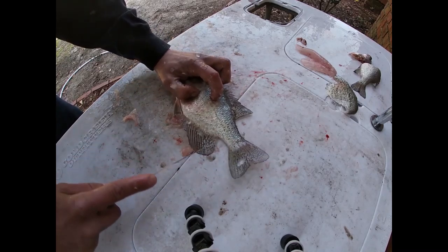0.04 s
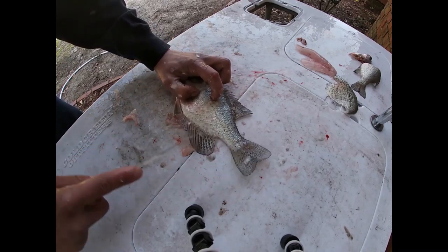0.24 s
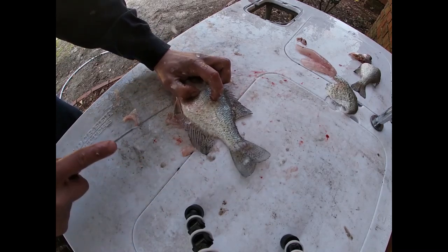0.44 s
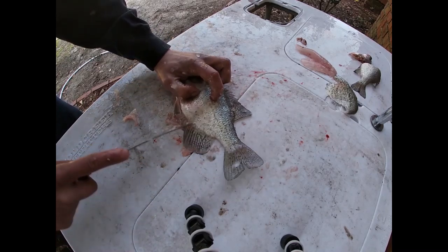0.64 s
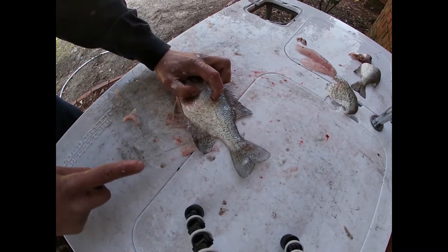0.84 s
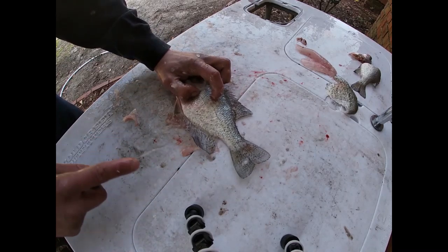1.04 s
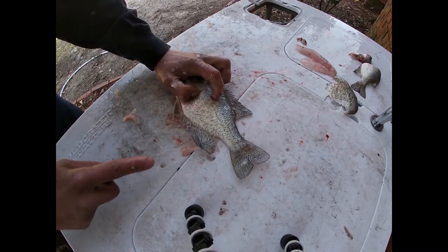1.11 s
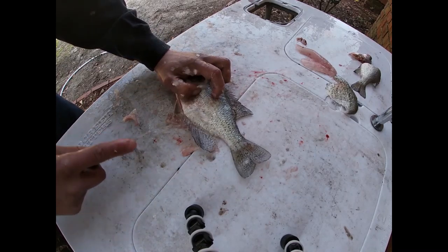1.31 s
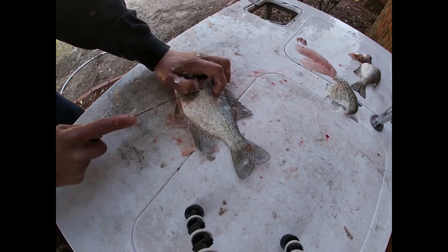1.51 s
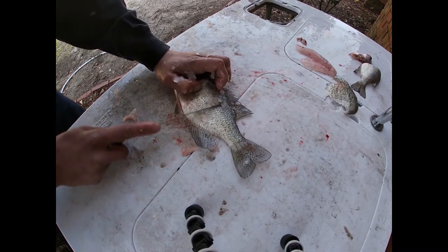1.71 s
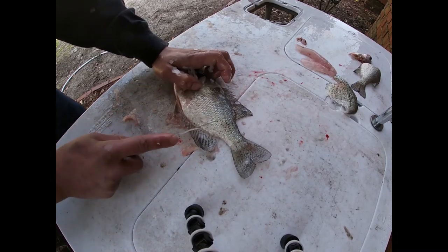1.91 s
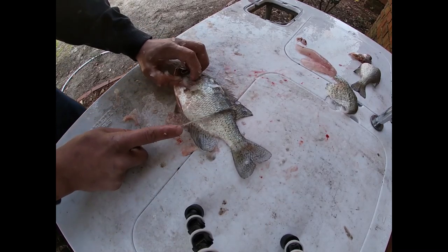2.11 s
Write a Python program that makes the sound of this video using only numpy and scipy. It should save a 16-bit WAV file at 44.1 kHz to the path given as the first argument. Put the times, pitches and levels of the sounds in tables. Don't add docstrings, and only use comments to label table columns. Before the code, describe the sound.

A knife rasps scales off a fish in quick, crackly strokes, knocking a hollow plastic table that booms softly; close small camera microphone outdoors, with low distant traffic rumble and very faint insect hiss.

```python
import sys
import numpy as np
from scipy import signal
from scipy.fft import rfft, irfft, next_fast_len
from scipy.io import wavfile
from scipy.ndimage import uniform_filter1d, map_coordinates

SR = 44100
rng = np.random.default_rng(int(sys.argv[2]) if len(sys.argv) > 2 else 0)


def master_out(mix):
    frames = np.transpose(np.atleast_2d(mix))
    ceiling = np.clip(frames, -1, 1)
    pcm = np.round(ceiling * 32767).astype(np.int16)
    wavfile.write(sys.argv[1], SR, pcm)


def convert_level_to_amplitude(level_db):
    exponent = np.asarray(level_db, float) / 20
    return 10 ** exponent


N = 94815


def unit(x):
    return x / np.sqrt(np.mean(x ** 2) + 1e-20)


def along(points, hz):
    f, v = np.transpose(points)
    return np.interp(np.log(hz + 1), np.log(f + 1), v)


def filtered(x, response):
    m = next_fast_len(x.shape[-1] + 4096)
    return irfft(rfft(x, m) * response(np.fft.rfftfreq(m, 1 / SR)), m)[..., :x.shape[-1]]


def peak(f, hz, width_hz):
    return 1j * f * width_hz / (hz * hz - f * f + 1j * f * width_hz)


def wobble(rate_hz, size):
    knots = rng.standard_normal(int(size / SR * 2000) + 4)
    return map_coordinates(knots, [np.arange(size) * min(rate_hz, 1900) / SR])


def add(track, start_s, piece):
    part = track[max(round(start_s * SR), 0):][:len(piece)]
    part += piece[:len(part)]


def grit(length_s, rise_s, fall_s, octaves, spiky_db, clump_db, q, spread_oct):
    t = np.arange(SR // 4) / SR
    lumps = np.array([wobble(232, len(t)), wobble(211, len(t))])
    level_db = spiky_db * rng.standard_normal(lumps.shape) + clump_db * lumps
    clicks = rng.standard_normal(lumps.shape) * convert_level_to_amplitude(level_db)
    hz = 1000 * 2 ** np.clip(octaves + np.array([[-spread_oct], [spread_oct]]), -1.6, 3.1)
    rise = np.clip(t / rise_s, 0, 1) ** 1.4
    shape = rise * np.exp(-np.clip(t - length_s, 0, None) / fall_s)
    burst = filtered(clicks * shape, lambda f: peak(f, hz, hz / q) ** 2 + 0.23).sum(0)
    return burst / np.sqrt(np.sum(burst ** 2) / np.sum(shape ** 2))


# frequency in Hz, width in Hz, level in dB.
BLADE = [(2279, 90, 0), (2830, 90, -2), (3960, 150, -2), (4860, 200, -4), (6073, 480, -1)]
# frequency in Hz, gain in dB.
SCRAPE = [(200, -11), (600, 7), (1200, 3), (3000, -6.5), (9500, -9.5), (11000, -18), (15000, -23)]


def through_blade(x):
    def response(f):
        modes = sum(convert_level_to_amplitude(db) * peak(f, hz, width_hz) for hz, width_hz, db in BLADE)
        return convert_level_to_amplitude(along(SCRAPE, f)) * (1.375 + modes)
    return filtered(x, response)


# start in seconds, rise in seconds, length in seconds, level in dB,
# brightness in octaves over 1 kHz.
STROKES = [(0, 0.001, 0.0073, -37.5, 2.2), (.178, 0.013, 0.077, -39.5, 2.2),
           (0.436, 0.013, 0.046, -34.5, 1.66), (0.715, 0.0018, 0.078, -38, 1.72),
           (0.811, 0.007, 0.045, -51, 2.03), (0.9722, 0.0012, 0.062, -34, 2.13),
           (1.232, 0.032, 0.12, -35.5, 2.36), (1.438, 0.0045, 0.13, -57, 1.66),
           (1.544, 0.0024, 0.067, -35.5, 2.2), (1.681, 0.0039, 0.029, -53, 1.67),
           (1.765, 0.018, 0.12, -49, 2.1), (1.899, 0.0061, 0.11, -56.5, 1.95)]


def strokes():
    x = np.zeros(N)
    for start_s, rise_s, length_s, db, octaves in STROKES:
        bed = grit(length_s, rise_s, 0.0072, octaves, spiky_db=5.5, clump_db=3.3, q=0.8, spread_oct=0.6)
        add(x, start_s, convert_level_to_amplitude(db) * bed)
    return through_blade(x)


def short_bursts(events):
    x = np.zeros(N)
    for start_s, db, octaves, ms in events:
        burst = grit(max(ms, 0.1) / 1000, 0.0007, 0.002, octaves,
                     spiky_db=4.4, clump_db=2.2, q=1.1, spread_oct=0.25)
        add(x, start_s, convert_level_to_amplitude(db - 9.5) * burst)
    return through_blade(x)


# start in seconds, peak in dB, brightness in octaves over 1 kHz, length in ms.
SLIPS = [(0.0044, -24.5, 4.8, 0.95), (0.0137, -26, 2.1, 1.3), (0.0538, -35.5, 1.83, 1.2),
         (0.1356, -43, 2.1, 1.7), (0.159, -23, 1.72, 2.4), (0.1916, -20, 2.45, 2.1),
         (0.2011, -19.5, 2.4, 1.5), (0.2126, -21, 1.85, 1.7), (0.224, -25.5, 1.33, 1.8),
         (0.2434, -21, 2.04, 5.7), (0.3461, -38.5, 1.2, 4.7), (0.4, -40, 1.2, 6.2),
         (0.4537, -11, 1.73, 1.1), (0.4582, -12, 2.17, 3.2), (0.4743, -16.5, 2.2, 1.3),
         (0.4775, -23, 4.2, 1.8), (0.623, -41.5, 2.6, 4.7), (0.6774, -27, 1.4, 1),
         (0.7172, -8, 1.65, 1.4), (0.7297, -13.5, 2, 2.5), (0.7368, -15.5, 1.12, 4),
         (0.748, -23.5, 2, 7.5), (0.7638, -17.5, 2.45, 1.1), (0.7705, -24, 1.5, 5.9),
         (0.7816, -9.5, 2.36, 1.54), (0.819, -36, 2.6, 3.3), (0.837, -38, 1.5, 3.1),
         (0.85, -29, 1.54, 1.9),
         (0.9739, -10, 2.34, 1.86), (0.9782, -11.5, 1.48, 1.7), (0.9879, -22.5, 1.58, 9),
           (1.0078, -19.5, 1.56, 2.5), (1.029, -17, 2.8, 1), (1.0388, -22, 2.6, 1.9), (1.2348, -31, 2, 1.5),
           (1.257, -26.5, 1.98, 6), (1.2864, -24, 2.26, 2.4), (1.2948, -15.5, 3.8, 5.3),
           (1.313, -19.5, 2.2, 7.6), (1.325, -18, 1.98, 8.6), (1.3383, -14.5, 2.48, 6.3),
           (1.462, -37.5, 1.33, 2), (1.5343, -29, 1.95, 3.6), (1.546, -33, 1.95, 6.5),
           (1.5512, -22, 2.13, 5), (1.5608, -22.5, 3.5, 3.7), (1.5703, -19.5, 2.2, 3.7),
           (1.5808, -15, 1.87, 2.2), (1.5915, -16.5, 1.87, 3.9), (1.6058, -28.5, 2.6, 4.3),
           (1.7928, -36, 2.4, 2.4), (1.823, -32.5, 1.8, 5.8), (1.8409, -22.5, 2.37, 2.5),
           (1.873, -37.5, 1.8, 4.5), (1.939, -36.5, 1.9, 4.6)]


def slips():
    return short_bursts(SLIPS)


# frequency in Hz, density in dB per Hz.
RUMBLE = [(12, -36), (20, -4), (49, -6), (119, -13), (145, -13.5), (230, -19), (340, -18.5), (400, -29.5),
          (520, -80), (880, -120)]
AIR = [(240, -18), (500, -3), (1230, -9.5), (1700, -16), (4200, -25.5), (9500, -28.5), (12500, -43.5),
       (15500, -44)]


def outdoors():
    noise = rng.standard_normal((3, N))
    rumble = unit(filtered(noise[0], lambda f: convert_level_to_amplitude(along(RUMBLE, f))))
    rumble *= convert_level_to_amplitude(-45 + 1.5 * wobble(6.3, N))
    air = unit(filtered(noise[1], lambda f: convert_level_to_amplitude(along(AIR, f))))
    air *= convert_level_to_amplitude(-54 + 1.1 * wobble(9, N) + 0.9 * wobble(60, N))
    insects = unit(filtered(noise[2], lambda f: peak(f, 6700, 1500) ** 2))
    insects *= convert_level_to_amplitude(-71 + 3 * wobble(45, N) + 2.5 * wobble(7, N))
    return rumble + air + insects


def ringing(hits, modes, rise_s, spread_db, detune, hold_s=0):
    x, t = np.zeros(N), np.arange(SR // 2) / SR
    contact = 1 - np.exp(-(t / rise_s) ** 2)
    for start_s, hit_db, lasts, *pitch in hits:
        ring = np.zeros(len(t))
        for hz, mode_db, t60_s in modes:
            level_luck, pitch_luck = rng.standard_normal(2)
            decay_db = 60 * np.clip(t - hold_s, 0, None) / (t60_s * max(lasts, 0.2))
            mode_hz = hz * np.prod(pitch) * (1 + detune * pitch_luck)
            ring += convert_level_to_amplitude(mode_db + spread_db * level_luck - decay_db) * np.sin(2 * np.pi * mode_hz * t)
        add(x, start_s, convert_level_to_amplitude(hit_db) * ring * contact)
    return x


# frequency in Hz, level in dB, t60 in seconds.
FRAME = [(62.2, -17.5, 1), (84.3, -6.5, 0.32), (154.1, -0.5, 0.23), (203.6, -5, 0.24), (342.4, -13, 0.22)]
# start in seconds, level in dB, ring length factor.
PUSHES = [(.005, -36, 1), (.21, -30, 0.55), (.722, -19, 0.72), (.79, -31, 0.66), (.985, -24, 0.72),
          (1.27, -30, 0.6), (1.33, -32.5, 0.47), (1.535, -32.5, 0.5), (1.555, -30, 0.92), (1.6, -36, 0.98),
          (1.63, -25.5, 0.21), (1.846, -20, 0.34), (1.88, -34, 0.8)]


def pushes():
    return ringing(PUSHES, FRAME, rise_s=0.0024, spread_db=1.28, detune=0.029)


# frequency in Hz, level in dB, t60 in seconds.
TOP = [(1270, -1, 0.014), (1255, -23, 0.05), (1590, -14, 0.016)]
# start in seconds, peak in dB, ring length factor, pitch factor.
KNOCKS = [(0.0136, -43.5, 0.44, 1.1), (0.16, -43, 1.8, 1.03), (0.186, -46, 0.74, 0.99),
          (0.2443, -41, 0.88, 0.92), (0.4045, -30.5, 2, 0.98), (0.4555, -19.5, 1.16, 1.004),
          (0.4632, -35, 0.6, 0.86), (0.6797, -45.5, 1.1, 1.02), (0.7168, -15.5, 1.33, 1.008),
          (0.7721, -34, 0.54, 0.95), (0.94, -47.5, 0.82, 1), (0.9767, -27, 1.5, 1.001),
          (1.5912, -27, 0.34, 0.94)]


def knocks():
    return convert_level_to_amplitude(3) * ringing(KNOCKS, TOP, rise_s=0.0016, spread_db=0.72, detune=0, hold_s=0.005)


def damped_tones(events):
    x, t = np.zeros(N), np.arange(SR // 5) / SR
    for start_s, db, hz, t60_s in events:
        contact = 1 - np.exp(-t * hz / 0.54)
        add(x, start_s, convert_level_to_amplitude(db - 60 * t / t60_s) * np.sin(2 * np.pi * hz * t) * contact)
    return x


# start in seconds, peak in dB, frequency in Hz, t60 in seconds.
SNAPS = [(.4746, -21, 5000, .004), (.7827, -9, 3000, .006), (.9752, -16, 5200, .004),
         (1.0282, -19, 4000, .005), (1.2857, -21, 5500, .004), (1.2959, -14, 6500, .003),
         (1.2978, -15, 7500, .004), (1.3418, -14, 5500, .003), (1.3438, -18, 6500, .004),
         (1.552, -22, 4200, .004), (1.5563, -22, 4000, .004), (1.607, -24, 3600, .005),
         (1.8424, -21, 4500, .004), (.1592, -27, 3800, .006), (.2137, -26, 5500, .004),
         (.2085, -30, 6000, .003)]


def snaps():
    return damped_tones(SNAPS)


# start in seconds, peak in dB, # brightness in
# octaves over 1 kHz, length in ms.
MORE_SLIPS = [(0.176, -30.5, 1.74, 4), (.4655, -39, 2.3, 1.4), (.724, -17, 2.2, 2.3), (.7555, -29, 2, 3),
              (.984, -26.5, 2.7, 3), (.997, -21, 1.6, 5.3), (1.834, -29.5, 2, 4.6), (1.851, -43, 1.9, 6),
              (1.864, -37, 2.6, 5.6), (1.885, -40, 1.8, 2.3), (1.9, -43, 2.8, 8), (1.921, -39, 2.7, 3)]


def more_slips():
    return short_bursts(MORE_SLIPS)


# start in seconds, level in dB, ring length factor.
TOUCHES = [(.18, -34, 1), (.41, -32, 0.5), (.679, -26, 1), (.96, -26, 0.22), (1.795, -26.5, 0.41)]


def touches():
    return ringing(TOUCHES, FRAME[2:3], rise_s=0.0024, spread_db=0.072, detune=0.027)


# start in seconds, peak in dB, frequency in Hz, t60 in seconds.
PINGS = [(.4542, -18, 2330, 0.015), (.459, -18.5, 2280, 0.02), (.459, -34, 3950, 0.033),
         (.468, -23, 2190, .03), (0.474, -30, 2850, .03), (0.4783, -26.5, 2190, .03),
         (.7405, -26.5, 3270, .02), (0.774, -23, 2900, .015), (.7826, -15, 2220, 0.014),
         (0.7813, -17, 2876, .016), (.798, -34, 2280, .025), (0.9774, -23.5, 3300, 0.021),
         (.989, -25.5, 3250, 0.035), (1.008, -28.5, 5380, .03), (1.028, -34, 1700, .015),
         (1.7935, -41, 2450, 0.027), (1.824, -39, 3840, .03), (0.251, -36, 276, 0.064),
         (0.456, -36, 337, 0.089), (0.759, -33.5, 273, 0.079), (1.04, -35.5, 264, 0.092),
         (1.34, -31, 320, 0.082)]


def pings():
    return damped_tones(PINGS)


# start in seconds, peak in dB,
# brightness in octaves over 1 kHz, length in ms.
FLANK = [(.455, -25.5, -0.12, 5.3), (.718, -18, -0.21, 2.5), (.976, -31.5, -0.21, 3),
         (1.338, -42.5, -1.25, 12), (1.551, -31.5, -0.24, 6.8), (1.592, -23.5, 0.12, 6.7),
         (1.824, -31.5, -0.52, 15.6), (1.84, -25.5, 0.54, 6.8)]


def flank_blows():
    return short_bursts(FLANK)


def short_echo(work):
    t = np.arange(SR // 5) / SR
    tail = rng.standard_normal(len(t)) * convert_level_to_amplitude(-60 * t / 0.06)
    return convert_level_to_amplitude(-18) * signal.fftconvolve(work, tail / np.linalg.norm(tail))[:N]


# frequency in Hz, side over mid in dB.
PORTS = [(60, -80), (1000, -54.5), (4000, -39), (11300, -32), (12000, -13.5), (16000, -4)]


def two_ports(mid):
    z = signal.stft(mid, nperseg=256)[2]
    phase = np.pi + 1.3 * rng.standard_normal(z.shape)
    other = signal.istft(z * np.exp(1j * phase), nperseg=256)[1][:N]
    side = filtered(other, lambda f: convert_level_to_amplitude(along(PORTS, f) + 10.5))
    return np.array([mid + side, mid - side])


def scene():
    work = strokes() + slips() + knocks() + snaps() + pings() + flank_blows()
    table = pushes() + touches()
    return two_ports(work + short_echo(work) + outdoors() + table + more_slips())


def roll_off(x):
    return signal.sosfilt(signal.butter(12, 15920, fs=SR, output="sos"), x)


def record(dry):
    hz, _, z = signal.stft(dry, SR, nperseg=1024)
    hz = hz[:, None]
    power = np.mean(abs(z) ** 2, axis=0)
    power = uniform_filter1d(uniform_filter1d(power, size=5, axis=0), size=2, axis=1)
    gate_hz, gate_db, gate_db_per_khz = 12000, -111, 3.3
    threshold = convert_level_to_amplitude(2 * (gate_db + gate_db_per_khz * (hz - gate_hz) / 1000))
    keep = (power > threshold) | (hz < gate_hz)
    band = np.clip((15900 - hz) / 200, 0, 1)
    x = signal.istft(z * keep * band, SR, nperseg=1024)[1][:, :N]
    return roll_off(x)


dry = scene()
out = record(dry)
master_out(out)
```